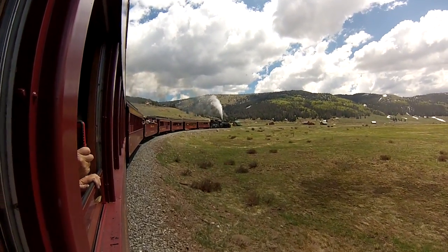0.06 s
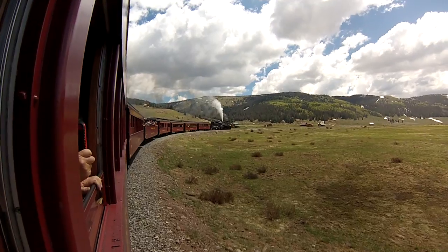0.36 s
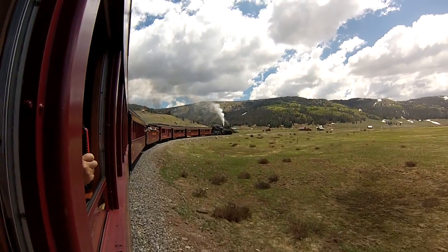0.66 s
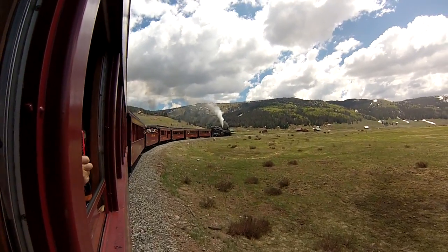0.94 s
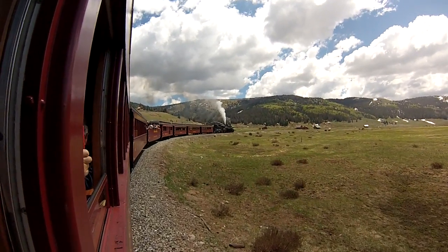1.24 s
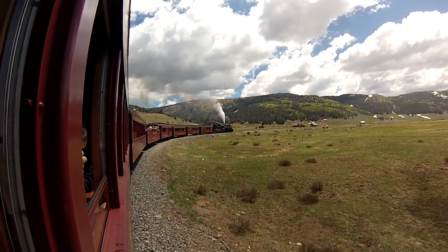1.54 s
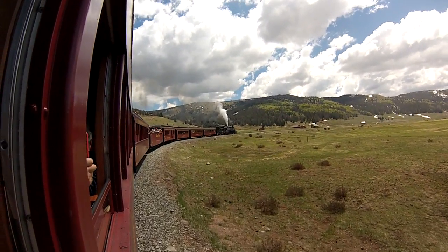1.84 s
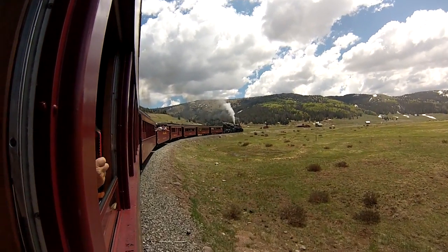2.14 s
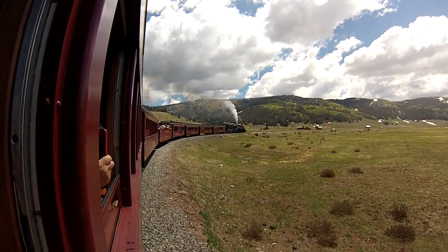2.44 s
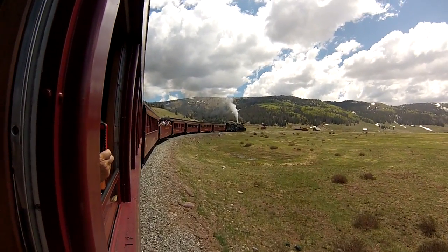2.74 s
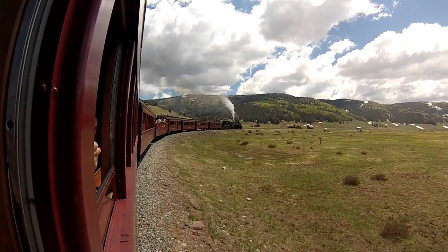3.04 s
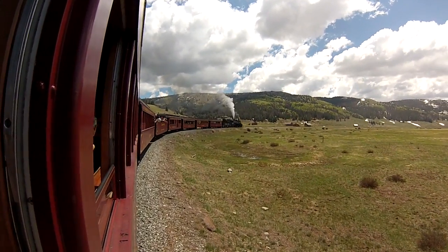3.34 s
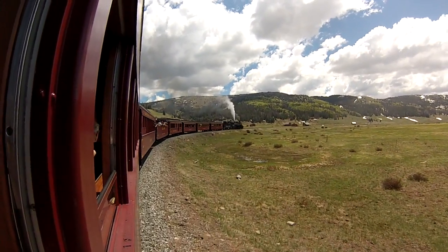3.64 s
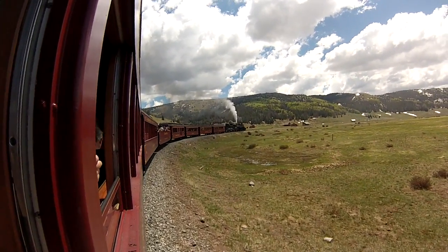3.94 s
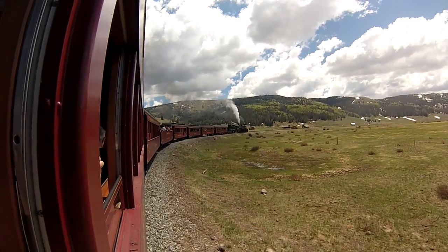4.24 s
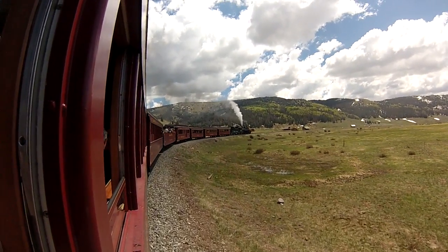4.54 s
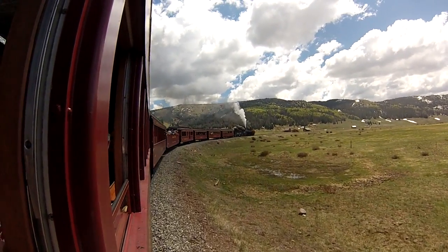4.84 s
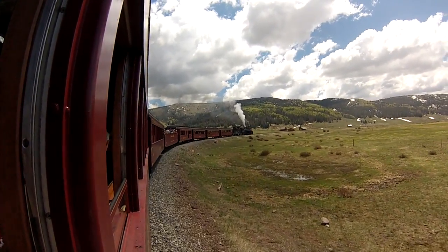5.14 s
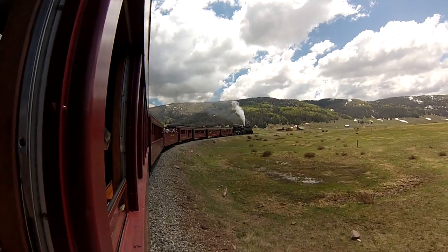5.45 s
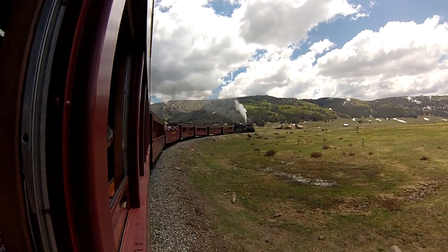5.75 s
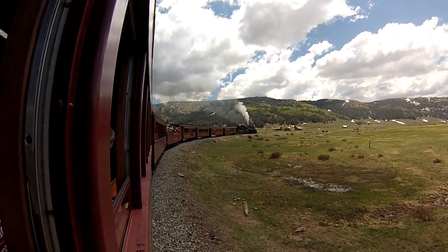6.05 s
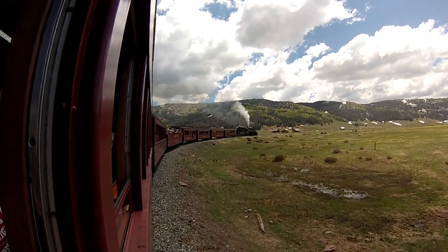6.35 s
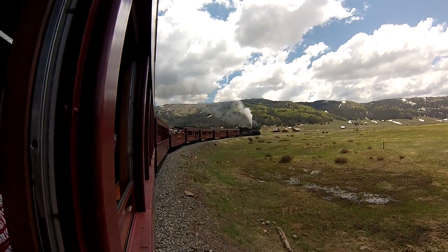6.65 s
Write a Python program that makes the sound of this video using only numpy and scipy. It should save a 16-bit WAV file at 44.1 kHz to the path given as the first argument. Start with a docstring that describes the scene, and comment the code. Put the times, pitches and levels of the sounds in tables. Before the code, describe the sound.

Low, fluttering wind hits a microphone just outside the window of a moving train and is strongest about halfway through. All the while, steel wheels scrape and sing against curving rails, rising and falling in gentle swells over an even rush and a low rolling rumble. Now and then a brief knock comes from under the carriage, the two clearest falling before and after the strongest gusts.

```python
"""On a long railway curve, with the microphone held out of a carriage window of the rolling train.
From below, wheel treads and flanges grind on the rails in slow swells and ring the steel.
Behind that the running gear rumbles and knocks now and then,
and right at the microphone the slipstream thumps and flutters."""
import sys
import numpy as np
from scipy import signal
from scipy.fft import rfft, irfft
from scipy.io import wavfile
from scipy.ndimage import uniform_filter1d

SR = 44100
rng = np.random.default_rng(int(sys.argv[2]) if len(sys.argv) > 2 else 0)


def store_pcm(level_fs):
    """Save levels as 16-bit WAV."""
    pcm = np.round(np.clip(level_fs, -1, 1) * 32767).astype(np.int16)
    wavfile.write(sys.argv[1], SR, np.atleast_2d(pcm).T)


N = 295029
TIME = np.arange(N) / SR
FREQ = np.maximum(np.arange(N // 2 + 1) * SR / N, 1)


def undb(db):
    """Decibels to gain."""
    return 10 ** (np.asarray(db) / 20)


def curves(table):
    """Each column after the first (seconds) as a control over time."""
    s, *columns = np.transpose(table)
    return [np.interp(TIME, s, column) for column in columns]


def swells(rows, sharpness=1.32):
    """Smooth rises and falls in dB, from rows of (middle s, length s, dB)."""
    total_db = np.zeros(N)
    for middle_s, length_s, db in rows:
        position = np.clip((TIME - middle_s) / length_s, -.5, .5)
        total_db += db * np.maximum(np.cos(np.pi * position), 0) ** sharpness
    return total_db


def through(x, response):
    """Filter by a frequency response."""
    return irfft(rfft(x, N) * response, N)


def colour(points):
    """Response through (Hz, dB) points."""
    hz, db = np.transpose(points)
    return undb(np.interp(np.log(FREQ), np.log(hz), db))


def resonance(hz, width_hz):
    """Response of one damped mode, gain 1 at its centre."""
    return 1 / (1 + 1j * (FREQ / hz - hz / FREQ) * hz / width_hz)


def noise():
    """White noise of 0 dB per Hz."""
    return rng.standard_normal(N) * np.sqrt(SR / 2)


def wander(rate_hz, count=512):
    """Random drift with a spread near 1, turning rate_hz times a second."""
    return np.interp(TIME * rate_hz, np.arange(count), rng.standard_normal(count))


# Rough track passing under the carriage. Each row: middle and length in seconds, rumble swell in dB.
ROUGH_STRETCHES = [(1.93, 0.38, 4.5), (2.55, 0.6, 2.5), (3.67, 0.32, 6.5), (4.22, 0.43, 4.5), (6.05, .6, 4)]
# The running gear, under the floor. Each row: frequency in Hz, level in dB per Hz.
GEAR_RUMBLE = [(40, -74), (120, -73), (200, -81), (300, -89), (390, -88.5), (550, -94.5), (760, -100),
               (1500, -115), (5000, -140)]
# The whole train, near and far. Each row: frequency in Hz, level in dB per Hz.
TRAIN_RUSH = [(200, -100), (760, -100), (1100, -99), (2500, -94.5), (4200, -101), (8000, -111),
              (13000, -115), (15000, -116)]


def rolling(sway_db=2.0, sway_hz=12):
    """Rough stretches of track rumble through the carriage, over the even rush of the train."""
    rough_db = swells(ROUGH_STRETCHES)
    rumble = through(noise(), colour(GEAR_RUMBLE))
    rumble *= undb(rough_db - np.mean(rough_db) + sway_db * wander(sway_hz))
    return rumble + through(noise(), colour(TRAIN_RUSH))


# The carriage, as the knocks ring it. Each row: frequency and width in Hz, relative level in dB.
CARRIAGE_MODES = [(217, 110, 12), (374, 39, 4), (484, 46, 5.5), (610, 100, 3), (910, 230, 2.5),
                  (1220, 97, -4), (1670, 61, 0)]
# Knocks from the running gear below the window. Each row: start in seconds, peak level in dB,
# centre of the blow in Hz, decay time of the rattle in seconds.
GEAR_KNOCKS = [ (.142, -46.5, 620, 0.011), (.25, -44, 140, .008), (0.772, -45.5, 338, 0.038),
               (1.05, -48, 230, 0.02), (1.597, -46, 560, 0.013), (1.969, -35.5, 1300, .002),
               (1.974, -35, 754, .003), (2.475, -45, 200, 0.017), (3.30, -43.5, 330, 0.017),
               (4.961, -35, 387, 0.0065), (4.966, -51, 1100, .006), (4.976, -41.5, 300, .016),
               (5.232, -50, 700, .003), (5.24, -41, 430, 0.006), (5.79, -46.5, 330, 0.019)]


def knocks(rattle=0.22, size=8192):
    """Slack parts strike and chatter briefly; a softer contact rings only the low modes."""
    body = sum(undb(db) * resonance(hz, width_hz) for hz, width_hz, db in CARRIAGE_MODES)
    ring = irfft(body, N)[:size]
    age = TIME[:size]
    out = np.zeros(N + size)
    for s, db, centre_hz, rattle_s in GEAR_KNOCKS:
        push = rattle * rng.standard_normal(size) * np.exp(-age / rattle_s)
        push[0] += 2  # the strike itself
        edges_hz = [centre_hz / np.sqrt(2), centre_hz * np.sqrt(2)]
        octave = signal.butter(1, edges_hz, "band", fs=SR, output="sos")
        blow = signal.sosfilt(octave, signal.fftconvolve(push, ring)[:size])
        start = int(s * SR)
        out[start:start + size] += undb(db) * blow / np.max(np.abs(blow))
    return out[:N]


def turbulence(spectrum, eddy_s):
    """Swirling pressure whose strength is even over spans longer than eddy_s."""
    pressure = through(noise(), colour(spectrum))
    span = int(eddy_s * SR)
    power = uniform_filter1d(uniform_filter1d(pressure ** 2, span), span)
    return pressure / np.sqrt(power)


# The slipstream just outside the window. Each row: time in seconds, relative buffeting in dB.
AIRFLOW = [(0, -28), (0.4, -21.5), (0.55, -27), (1.0, -26), (2.1, -25), (2.4, -29.5), (2.75, -29.5),
           (3.1, -27.0), (3.85, -27), (4.3, -25), (4.7, -31), (5.1, -25), (5.6, -27.5), (6.0, -21.5),
           (6.69, -30)]
# Gusts straight onto the microphone. Each row: middle in seconds, extra buffeting and flutter in dB.
MIC_GUSTS = [(.28, 1.5, 3), (1.05, 0, 7), (1.33, 1, 5.5), (1.87, 3.5, 5), (2.1, 3.5, 2), (2.94, 10, 3.5),
             (3.34, 6, 8), (3.63, 6.5, 6.5), (4.06, 2, 5), (4.48, 2.5, 3.5), (4.9, 1, 4), (5.28, 2.5, 2.5),
             (5.78, 2.5, 2.5), (6.1, 2, 2), (6.42, 0, 2.5)]
# Large eddies on the microphone. Each row: frequency in Hz, relative level in dB.
BUFFET_SPECTRUM = [(1, -65), (4, -10.5), (12, -10.5), (17, 3.5), (28, 1), (34, -6.5), (45, -14), (65, -41),
                   (150, -81), (600, -120)]
# Small eddies on the microphone. Each row: frequency in Hz, relative level in dB.
FLUTTER_SPECTRUM = [(8, -56), (25, -32), (42, -4), (58, 1), (72, -7), (82, -13), (92, -13), (120, -20.5),
                    (170, -33), (280, -41.5), (2000, -95)]


def wind(buffet_db=-2.0, flutter_db=-39.5, gust_s=0.21, surge_db=1.1, surge_hz=9):
    """Large eddies shed by the carriage side thump the microphone; smaller ones flutter on top."""
    stream_db, = curves(AIRFLOW)
    large_db = swells([(s, gust_s, db) for s, db, _ in MIC_GUSTS]) + surge_db * wander(surge_hz)
    small_db = swells([(s, gust_s, db) for s, _, db in MIC_GUSTS]) + surge_db * wander(surge_hz)
    buffets = turbulence(BUFFET_SPECTRUM, eddy_s=0.059) * undb(stream_db + large_db + buffet_db)
    flutter = turbulence(FLUTTER_SPECTRUM, eddy_s=0.12) * undb(small_db + flutter_db)
    return buffets + flutter


# Reflections off surfaces near the microphone. Each entry: extra travel time in seconds.
ECHO_LAGS = [.0037, .0061, .0094]


def reflected(x, echo_db=-12, drift_s=.00012, drift_hz=3, above_hz=4300):
    """Treble glances off ballast and carriage sides; the paths drift, so streaks shift in the hiss."""
    treble = signal.sosfilt(signal.butter(4, above_hz, "high", fs=SR, output="sos"), x)
    echoes = sum(np.interp(TIME - lag - drift_s * wander(drift_hz), TIME, treble) for lag in ECHO_LAGS)
    return x + undb(echo_db) * echoes


# The wheels creep slowly sideways in the curve.
# Each row: time in seconds, relative drive of tread and of rim in dB.
WHEEL_CREEP = [(0, -52.5, -56.0), (0.7, -51.5, -57.5), (1.2, -50.5, -54), (1.9, -50, -54),
               (2.1, -50, -50.5), (2.55, -48.5, -50), (2.95, -47.5, -55.3), (3.17, -51.4, -57),
               (3.6, -47.5, -56), (4.0, -47, -53), (4.65, -45, -53), (5.3, -51, -54), (5.8, -53, -54.5),
               (6.0, -46.7, -51.5), (6.35, -47.5, -49), (6.69, -50.5, -56)]
# The flanges lean on the rail about twice a second.
# Each row: middle and length in seconds, extra drive of singing, hiss and fine scraping in dB.
FLANGE_RUBS = [(0.03, 0.29, 4.5, 7, 6.5), (.43, 0.58, 4, 8.5, 5.5), (1.01, 0.58, 8.5, 10.5, 8),
               (1.642, 0.47, 10, 11.5, 8.5), (1.95, 0.46, 6.5, 8.5, 5), (2.54, .46, 9, 6.5, 9),
               (2.91, 0.53, 5.5, 6.5, 8.5), (3.524, .66, 5.5, 5, 5), (3.78, 0.29, 5, 4.5, 4),
               (4.22, 0.43, 2.5, 2, 4), (4.84, 0.81, 10, 9, 9), (5.292, 0.33, 4.5, 6, 5.5),
               (5.558, 0.38, 5, 5, 7), (6.016, 0.43, 5, 2.5, 4), (6.166, 0.3, 2.5, 6.5, 8.5),
               (6.56, 0.64, 9, 9, 10.5)]


def rail_contact(wander_db=0.77, wander_hz=9, rub_drag=0.39):
    """Creep, flange rubs and a little chance drive each part of the wheel, in dB about its mean."""
    tread, rim = curves(WHEEL_CREEP)
    middle_s, length_s, *strengths = np.transpose(FLANGE_RUBS)
    singing, hiss, scrape = (swells(zip(middle_s, length_s, db), sharpness=1.22) for db in strengths)
    drag = rub_drag * singing  # a rubbing flange adds to the creep of tread and rim
    drives = tread + drag, rim + drag, singing, hiss, scrape
    return [db - np.mean(db) + wander_db * wander(wander_hz) for db in drives]


# Wheel and rail resonances from below the window, grouped by what drives them.
# Each row: frequency and width in Hz, level in dB per Hz at 0 dB of drive, dB of swell per dB of drive.
STEEL_MODES = { "load": [(873, 75, -88, 0.15), (962, 119, -87.5, 0.27), (1704, 270, -81, 0.66),
               (1963, 125, -81.5, 0.73), (3143, 530, -87, 0.84), (3400, 65, -82.5, 1.23),
               (3581, 130, -80.5, 0.22), (3863, 410, -88, 1.3)], "mid": [(1216, 82, -89, 0),
               (1452, 300, -82.5, 0.55)], "tread": [(2131, 57, -77, 1.0), (2225, 110, -75.5, 0.97),
               (2373, 77, -76, 1.0), (2464, 75, -77, 0.5)], "rim": [(2594, 126, -80, 1.72),
               (2644, 91, -81, 1.07), (2787, 120, -90.5, 2)], "singing": [(4386, 135, -90.5, 0.7),
               (4624, 230, -83, 0.52), (4883, 230, -81.5, 0.8), (4957, 165, -82.5, 1.05),
               (5034, 118, -79, 1.0), (5256, 310, -87.5, 0.56)], "hiss": [(5710, 350, -88, 0.85),
               (6060, 450, -88, 0.5), (6200, 260, -97, 3), (6624, 580, -89, 1.0)],
               "scrape": [(7330, 1150, -95.5, 1.0), (9220, 560, -105, 1.76), (11500, 1300, -109.5, 1)]}
# Fine scraping between the resonances. Each row: frequency in Hz, level in dB per Hz at 0 dB of drive.
SCRAPE_SPECTRUM = [(3000, -115), (6500, -102), (8000, -104), (9250, -107), (10100, -109), (11200, -111),
                   (12600, -119), (14000, -132)]
# The ring near 1.4 kHz rises, then sinks. Each row: time in seconds, extra drive in dB.
MID_DRIVE = [(0, 0), (1.6, 0), (2.5, 3.5), (4.2, .5), (5.4, -2.5), (6.69, -3)]


def wheels(flicker_db=1.14, flicker_hz=16, judder_db=0.3, judder_hz=45, slip_db=1.0, slip_samples=32):
    """Countless tiny slips ring the steel; each part of the contact favours its own modes."""
    tread, rim, singing, hiss, scrape = rail_contact()
    # the rail and the lower modes feel the whole sideways load
    load = np.mean([tread, rim, singing, hiss], axis=0)
    mid = load + curves(MID_DRIVE)[0]
    drives = dict(load=load, mid=mid, tread=tread, rim=rim, singing=singing, hiss=hiss, scrape=scrape)
    # each slip lasts under a millisecond and has its own strength
    strengths = undb(slip_db * rng.standard_normal(N // slip_samples + 1))
    slips = np.repeat(strengths, slip_samples)[:N]
    slips /= np.sqrt(np.mean(slips ** 2))
    out = through(noise() * slips, colour(SCRAPE_SPECTRUM)) * undb(scrape)
    for part, modes in STEEL_MODES.items():
        for hz, width_hz, db, swell in modes:
            # the contact point wanders across the wheel, so each mode also flickers alone
            force = undb(db + swell * drives[part] + flicker_db * wander(flicker_hz))
            out += through(noise() * slips * force, resonance(hz, width_hz) ** 2)
    # the contact grips and lets go, shaking all modes together
    return out * undb(judder_db * wander(judder_hz))


def scene():
    """Everything meets at one microphone outside the window."""
    return (reflected(wheels()) + rolling() + knocks() + wind())[None]


def record(dry, top_hz=15250, ease_s=.004):
    """The highest treble is cut off steeply; the sound eases in and out over a few milliseconds."""
    ease = np.clip(np.minimum(TIME, TIME[-1] - TIME) / ease_s, 0, 1)
    lowpass = signal.ellip(10, .2, 80, top_hz, fs=SR, output="sos")
    return signal.sosfilt(lowpass, dry * ease)


dry = scene()
out = record(dry)
store_pcm(out)
```